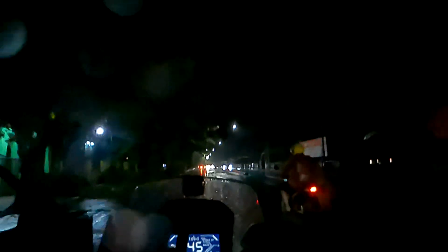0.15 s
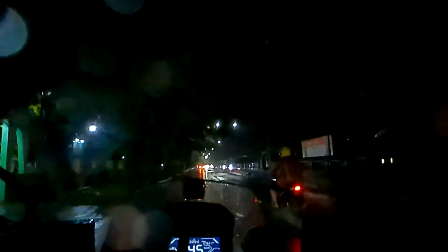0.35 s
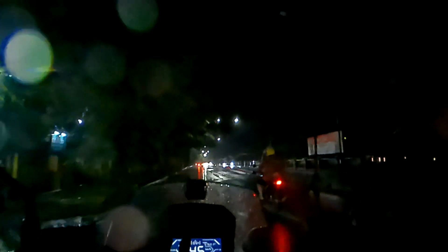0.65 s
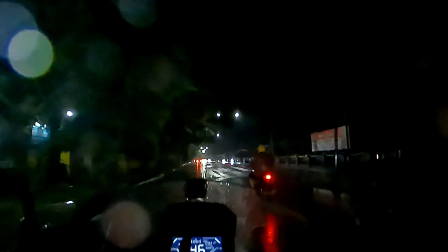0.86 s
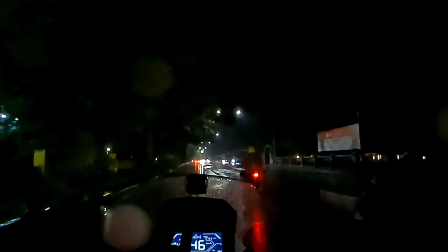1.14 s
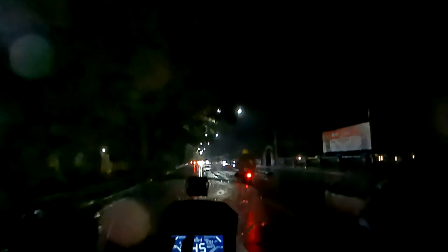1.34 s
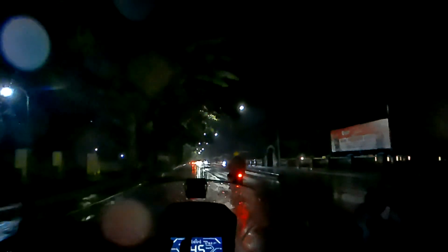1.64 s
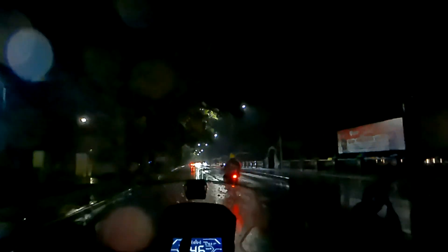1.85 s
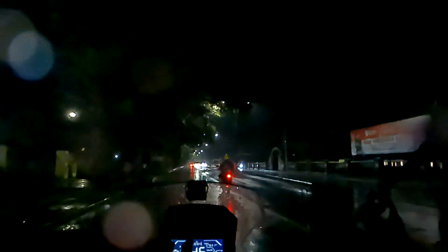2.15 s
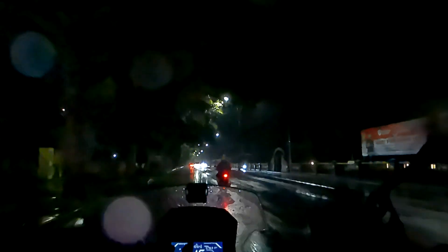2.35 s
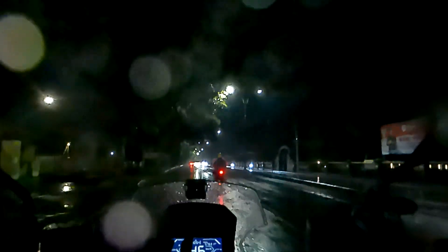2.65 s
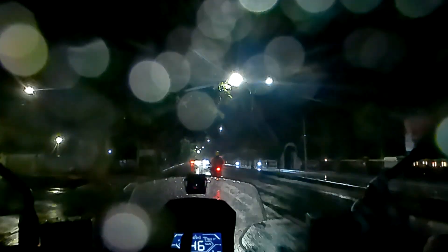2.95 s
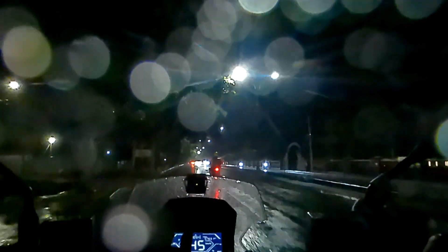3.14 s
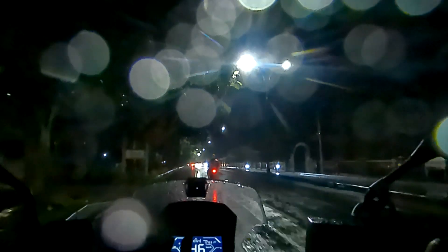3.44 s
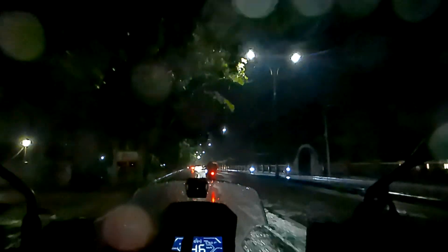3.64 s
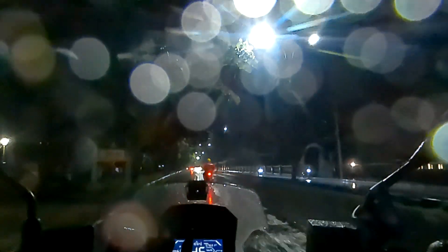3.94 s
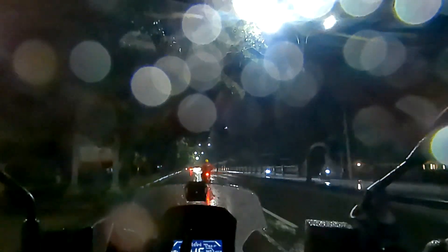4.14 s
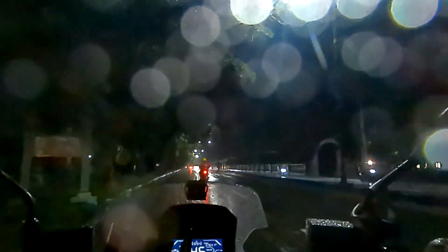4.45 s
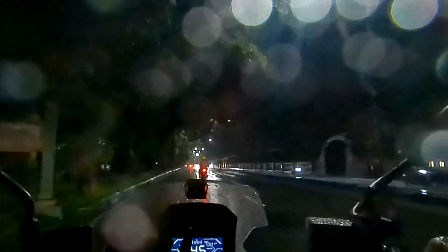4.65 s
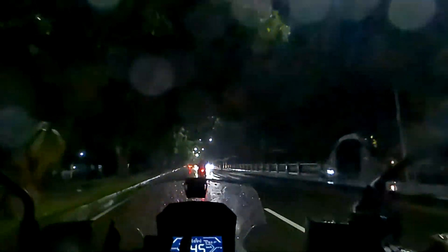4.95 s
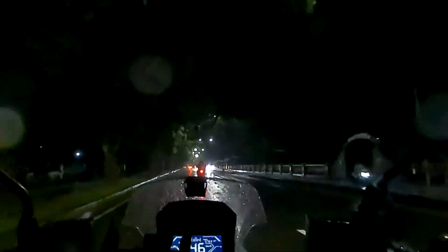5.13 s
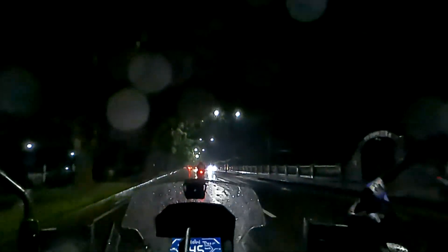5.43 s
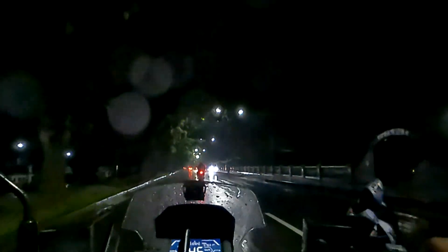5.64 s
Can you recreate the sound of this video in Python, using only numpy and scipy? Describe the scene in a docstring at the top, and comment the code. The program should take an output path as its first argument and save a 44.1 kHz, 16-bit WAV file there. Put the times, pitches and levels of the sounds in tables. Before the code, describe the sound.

Irregular close knocks of rain on plastic, with gusty wind thumps and the muffled drone of a scooter riding a wet road.

```python
"""On a scooter in night rain, heard from a camera in a closed plastic case.
Drops knock on the case and the screen beside it and ring their short modes; sheets of water break over it.
Wind buffets the microphone. Engine and wet-tyre roar comes through the same shell, dull and coloured,
with fine spray crackling above it."""
import sys
import numpy as np
from scipy import signal
from scipy.fft import rfft, irfft, next_fast_len
from scipy.io import wavfile
from scipy.ndimage import uniform_filter1d

SR = 44100
rng = np.random.default_rng(int(sys.argv[2]) if len(sys.argv) > 2 else 0)


def persist_wave(psi):
    """Save psi, clipped to +-1, as 16-bit WAV."""
    counts = np.round(np.clip(psi, -1, 1) * 32767).astype(np.int16)
    wavfile.write(sys.argv[1], SR, np.atleast_2d(counts).T)


N = 255339

# case hollows: f/Hz, width/Hz, gain/dB
HOLLOWS = [(500, 1100, -8), (1146, 40, 5), (1267.5, 380, 8), (1465, 41, 8.5), (1906, 390, 3),
           (2440, 380, -3), (3100, 250, -31.5), (4200, 700, -20.5), (5900, 1200, -27), (8200, 4000, -40)]
# envelopes: t/s, level/dB
ROAR_LEVEL = [(0.0, -62), (1.21, -61), (1.53, -63.5), (1.92, -62), (2.5, -58), (2.61, -60.5), (2.85, -58.5),
              (3.1, -61.5), (3.39, -62), (3.48, -60), (4.26, -63.5), (4.56, -63.5), (4.95, -61.5),
              (5.37, -62), (5.79, -61)]
SPRAY_LEVEL = [(0.0, -64), (0.16, -77), (0.68, -79.5), (1.01, -76), (1.84, -80.5), (2.0, -76), (2.43, -83),
               (2.61, -75), (3.22, -81.5), (3.85, -80), (4.37, -80), (4.59, -79.5), (4.71, -84.5),
               (5.14, -83), (5.55, -78.5), (5.79, -82)]
FLUTTER_LEVEL = [(0, -64.5), (.4, -65.5), (.98, -66.5), (1.21, -69), (2.26, -69.5), (2.52, -66),
                 (3.39, -69), (4.01, -61.5), (4.45, -72), (5.79, -65.5)]
# noise spectra: f/Hz, relative density/dB
SPRAY_SPECTRUM = [(2000, -26.5), (3000, -9.5), (3500, 3), (4200, 3.5), (5000, -7), (6000, -5), (7500, -9.5),
                  (9500, -17), (11000, -17.5), (12000, -42)]
BUFFET_SPECTRUM = [(3.5, -30), (6.0, -4.5), (16, 1), (29, 3.5), (51, -5.5), (71, -11), (118, -24.5),
                   (140, -20.5), (180, -41.5), (310, -120)]
FLUTTER_SPECTRUM = [(47, -20.5), (80, 4), (119, 0), (156, 1.5), (337, -11), (424, -11), (629, -15.5),
                    (1100, -22), (1430, -54), (2420, -120)]
# wind slaps: t/s, buffet level/dB, length/s, flutter level/dB
GUSTS = [(0.0, -41, 0.12, -59), (0.317, -46.5, 0.16, -74), (0.629, -41, .04, -68),
         (0.741, -43.5, 0.074, -71), (0.834, -39.5, 0.089, -64.5), (0.918, -44, 0.05, -62),
         (1.121, -39.5, 0.13, -57), (1.367, -46.5, 0.027, -58), (1.44, -48.5, 0.053, -60.5),
         (1.581, -35.5, 0.016, -64), (1.759, -53.5, 0.083, -67), (1.97, -46, 0.072, -61),
         (2.256, -49, 0.028, -71), (2.442, -42.5, 0.033, -56), (2.553, -45.5, 0.04, -60),
         (2.683, -42.5, 0.04, -50), (2.85, -60, 0.036, -58.5), (2.96, -57, 0.051, -59),
         (3.208, -47, 0.049, -63), (3.331, -54.5, .05, -53.5), (3.59, -56, 0.095, -75),
         (3.803, -44.5, 0.042, -64), (3.961, -43.5, 0.025, -70), (4.095, -51.5, 0.056, -72.5),
         (4.248, -42, 0.045, -57.5), (4.413, -43.5, 0.097, -64.5), (4.591, -49, 0.039, -67.5),
         (4.77, -49, 0.047, -61), (4.849, -42.5, .025, -64.5), (4.943, -45, 0.036, -66.5),
         (5.12, -43, 0.041, -69.5), (5.27, -52, 0.052, -64), (5.415, -38, 0.042, -58),
         (5.533, -54.5, 0.12, -66), (5.684, -48.5, 0.11, -66.5), (5.79, -39, 0.045, -66.5)]
# shell modes common to all drops: f/Hz, t60/s, gain/dB
SHELL_MODES = [(611, 0.034, -5.5), (777, 0.035, -2), (1060, 0.0023, -10), (1198, 0.0081, -8),
               (1353, 0.017, -5), (1864, 0.035, -3.5), (2186, 0.02, 2.5), (2840, 0.033, -12.5),
               (3090, 0.023, -6.5), (4407, 0.025, -10.5), (4930, 0.0031, -0.5), (5907, 0.016, -10),
               (6720, 0.005, -8.5), (7840, .009, -11), (9204, 0.0031, -9), (10940, .014, -24.5)]
# zones of a drop's spectrum: f/Hz
ZONES_HZ = [220, 750, 1400, 2150, 3100, 4150, 5600, 8500]
# impact spots, boomy back (row 0) to ticking front (row 8): gain/dB per zone
SPOTS = [(-1, -15, -27, -11, -16.5, -22.5, -21, -27), (-19, 1, -1, -11, -10, -18.5, -27, -26),
         (-24.5, -28.5, -0.5, -22.5, -15, -19.5, -14, -24), (-30, -20.5, -2, 2, -7.5, 0, -10, -7),
         (-23, -21, -12, -15.5, 3, -11.5, -27, -19), (-12, -22, -1.5, -9, -1, -3.5, -4.5, -1.5),
         (-30, -23.5, -24, -20, -15, 4.5, -44, -40), (-32, -24, -21.5, -27, -19.5, -5, -15.5, 3),
         (-34, -24.5, -23, -24.5, -10, -23, -12, -3)]
# distinct drops: t/s, level/dB, boom/dB, spot/0-8, hardness/(dB/octave),
# thud/Hz, knock/Hz, ping/Hz, t60 scale, splash/dB
DROPS = [(.002, -23.5, -13, 0.5, 1, 184, 1277, 4280, 0.94, -28),
         (.012, -15, -23, 4.5, -1.5, 151, 1380, 4080, 0.62, -17),
         (.097, -44.5, 3.5, 1.5, 0, 164, 1238, 4340, 1, -4.5),
         (.281, -34.5, -6, 6.5, -0.5, 171, 1190, 3770, 0.7, -10),
         (.391, -40.5, 5, 6.5, 0, 157, 1150, 3800, 0.46, -11),
         (0.462, -52, -2.5, 5, -5, 150, 1190, 4040, 0.57, -2),
         (0.577, -47, 8.5, 2, -2.5, 136, 1190, 3850, 1.5, -12),
         (1.008, -53, 8, 4.5, 3.5, 164, 1155, 4120, 0.52, 0),
         (1.097, -50, -10, 0, -0.5, 167, 1750, 3850, 1, 1.5),
         (1.277, -40, 3, 4.5, -4, 138, 1247, 3500, 0.56, -8.5),
         (1.417, -10.5, 2.5, 11, 4.5, 131, 1292, 4250, 0.74, -14),
         (1.588, -51, 10, 3.5, -1, 133, 1250, 4200, 1, -6),
         (1.604, -45.5, -3.5, 5, -2, 182, 1452, 4750, 0.87, 1.5),
         (1.907, -44.5, -7, 1, -1, 170, 1205, 3800, 1, -29),
         (1.958, -63, -1, 5.5, 2.5, 133, 1350, 4180, 0.97, -17),
         (1.98, -41.5, 8.5, 2, -2.5, 225, 1246, 4160, 0.47, -2.5),
         (1.997, -39, 0, 2, 2.5, 131, 1354, 3880, 0.65, -7),
         (2.026, -23, -2.5, 7, 1.4, 344, 1320, 4160, 0.33, -10.5),
         (2.055, -52, -2, 5, -4, 167, 1450, 3850, 0.86, -20),
         (2.076, -36, -1, 6, 5, 132, 1130, 3810, 0.89, -18),
         (2.085, -47, 8, 6.5, -2, 175, 1460, 3970, .61, -19),
         (2.211, -19.5, -6, 8, -2, 178, 1228, 4200, 1, -8.5),
         (2.374, -12.5, 1, 2, -1.5, 254, 1375, 3760, .45, -27),
         (2.474, -22.5, -0.5, 7, -0.5, 130.2, 1283, 3950, 0.6, -11),
         (2.686, -26, -9, 5, 3.5, 131.5, 1205, 3820, 0.32, -9),
         (2.701, -25, 3.5, 3.5, -2.5, 129, 1345, 3850, 0.6, -8.5),
         (2.716, -9.5, 2, 4, 0.5, 269, 1195, 3830, 0.54, -20.5),
         (2.732, -35.5, 2.5, 3.5, -6, 196, 1150, 3870, 0.83, -23),
         (2.779, -42, 0.5, 0, 0.5, 257, 1280, 3840, 1, -2.5),
         (2.967, -27.5, -6, 8, 0.5, 145.2, 1276, 4290, 1, -4),
         (3.004, -32, -0.5, 6, -2, 170, 1293, 3770, 1, -18.5),
         (3.161, -54, 5.5, 5, -1.5, 162, 1510, 3950, 0.91, 0),
         (3.322, -27, -4, 3, 1.7, 158, 1196, 4060, 0.59, -12),
         (3.341, -33.5, -0.5, 1, -2, 200, 1343, 4120, 0.5, -10),
         (3.446, -47, 1.5, 0.5, -2.5, 194, 1380, 3840, .71, -6),
         (3.475, -44, 8, 1.5, 0.5, 270, 1214, 3840, 0.97, -7),
         (3.485, -40.5, -0.5, -0.5, -1.8, 141, 1230, 3710, 0.71, -7),
         (3.493, -36.5, 0.5, 0.95, 0, 188.5, 1515, 3750, 1, -20),
         (3.609, -19, -4, 7, 0, 295, 1293, 3935, 0.55, -13),
         (3.676, -49.5, 1.5, 0, -2, 342.6, 1270, 4500, .69, 1),
         (3.855, -50.5, 5, 0, -1.5, 242.6, 1337, 4440, 0.75, -29),
         (3.958, -46, -7, 1.5, -5.5, 131.3, 1320, 4220, 0.71, -25.5),
         (4.036, -57.5, 0.5, 1.5, 5.5, 148, 1355, 3930, 0.91, -20),
         (4.172, -51.5, 0.5, -0.5, 0.5, 131, 1270, 4060, 1, -26.5),
         (4.319, -47, -6, 1.5, -1.5, 167.8, 1273, 4060, 0.79, -8),
         (4.389, -51.5, -3.5, 1, 5.5, 148, 1553, 3930, 0.74, -23),
         (4.585, -47.5, 7.5, 1.1, 1.5, 142.3, 1190, 4125, 0.88, -7.5),
         (4.64, -55, 6, 6, -1, 142.2, 1320, 3940, .9, -16),
         (4.704, -4.5, 3.5, 2, 2, 161, 1602, 3930, 0.67, -27.5),
         (4.716, -35, -3, 2.5, -5, 215, 1280, 3800, 0.85, -24.5),
         (4.817, -12.5, 1.5, 7.5, 1.5, 434, 1257, 4200, 0.72, -14),
         (5.039, -53.5, 1.5, 3, -7.5, 161, 1305, 4360, .66, -2.5),
         (5.294, -55, 1.5, 6.5, 3.5, 173, 1190, 4110, 1, -6),
         (5.376, -38, 2.5, 7, -0.5, 172, 1300, 3730, 0.82, -9.5),
         (5.515, -33, -4.5, 0.9, -1.5, 165, 1314, 3830, 0.56, -10),
         (5.561, -50, 6, 2, 2, 132, 1560, 3900, 0.94, -9),
         (5.695, -41.5, -10, 1, -0.5, 132, 1338, 3820, 1, -30),
         (5.709, -41, -10, 5.5, 0, 133, 1340, 4040, 1, -12)]
# water sheets: t/s, length/s, level/dB, treble/dB
SHEETS = [(0.002, 0.034, -61.5, -28), (0.274, 0.027, -70, 0), (0.368, 0.063, -70.5, -10),
          (0.434, 0.1, -73.5, -18), (1.018, 0.023, -76, -15), (1.413, 0.029, -53, -15.5),
          (1.586, 0.048, -69.5, 0.5), (1.964, 0.041, -64, -18), (2.037, 0.037, -65, -11),
          (2.206, 0.022, -72, 3), (2.387, 0.049, -68, -10), (2.727, 0.037, -65, -15),
          (2.958, 0.045, -63.5, -8.5), (3.159, 0.023, -70.5, -6), (3.33, 0.037, -70, -9),
          (3.434, 0.079, -76.5, 3.5), (4.812, 0.027, -55, -5), (5.039, 0.042, -82.5, 0),
          (5.286, 0.03, -71, -12.5), (5.38, 0.019, -67, 0), (5.553, 0.062, -72, 2.5),
          (5.702, 0.024, -68, 0.5)]

SPRAY_PER_S, PATTER_PER_S = 1500, 22
LULL_DB = -57  # buffet between slaps
THUD_T60_S, KNOCK_T60_S, PING_T60_S, SPLASH_T60_S = 0.044, 0.03, 0.016, 0.14
PUSH_S, BOOM_BELOW_HZ, CLEAN_KNOCK_DB_PER_DB = 0.00027, 1000, 0.18
TREBLE_CUT_HZ, OUTPUT_CUT_HZ, HISS_DB, DC_OFFSET = 11100, 15600, -92.5, -.0021


def undb(db):
    """Decibels to gain."""
    return 10 ** (np.asarray(db) / 20)


def unit(x):
    """Scale to rms 1."""
    return x / np.sqrt(np.mean(x ** 2))


def smooth(x, samples):
    """Two-pass moving average."""
    return uniform_filter1d(uniform_filter1d(x, samples), samples)


def envelope(table):
    """Gain per sample from t/s, level/dB rows."""
    return undb(np.interp(np.arange(N) / SR, *np.transpose(table)))


def walk(rate_hz):
    """Smoothed random steps, rms 1."""
    hold = int(SR / rate_hz)
    steps = np.repeat(rng.standard_normal(N // hold + 1), hold)
    return unit(smooth(steps, hold)[:N])


def coloured(spectrum, x=None):
    """Noise, or x, shaped by a spectrum; rms 1."""
    size = next_fast_len(N)
    hz = np.maximum(np.arange(size // 2 + 1) * SR / size, 1)
    knot_hz, knot_db = np.transpose(spectrum)
    db = np.interp(np.log(hz), np.log(knot_hz), knot_db, left=-90, right=-90)
    x = rng.standard_normal(N) if x is None else x
    return unit(irfft(rfft(x, size) * undb(db), size)[:N])


def add(out, start_s, sound):
    """Mix sound into out."""
    i = max(int(start_s * SR), 0)
    out[i:i + len(sound)] += sound[:N - i]


def road_roar():
    """Engine and tyre noise rings the case hollows."""
    roar, ripple_db = 0, 1.5 * walk(50)
    for hz, width_hz, db in HOLLOWS:
        hollow = signal.iirpeak(hz, hz / width_hz, SR)
        band = signal.lfilter(*hollow, signal.lfilter(*hollow, rng.standard_normal(N)))
        gain = undb(db + walk(10) + 2 * walk(35) + ripple_db)
        roar = roar + gain * unit(band) * np.sqrt(width_hz)
    return unit(roar) * envelope(ROAR_LEVEL)


def spray():
    """Fine droplets of very unequal size crackle; each treble band comes and goes in patches."""
    droplets = (rng.random(N) < SPRAY_PER_S / SR) * undb(2.5 * rng.exponential(size=N))
    smear = signal.lfilter([1], [1, -np.exp(-1 / (.003 * SR))], droplets)  # 3 ms decay
    mist = coloured(SPRAY_SPECTRUM, smear * rng.standard_normal(N))
    crackle, gust_db = 0, 1.5 * walk(25)
    for band_hz in [(2000, 3500), (3500, 5000), (5000, 7000), (7000, 9000), (9000, 12000)]:
        band = signal.sosfilt(signal.butter(2, band_hz, "band", fs=SR, output="sos"), mist)
        crackle = crackle + undb(gust_db + 1.8 * walk(35)) * band
    return unit(crackle) * envelope(SPRAY_LEVEL)


def wind():
    """Slow pressure slaps on the microphone; each drags a higher flutter along."""
    t = np.arange(0, N + 128, 128) / SR
    peak_s, buffet_db, length_s, flutter_db = np.transpose(GUSTS)[:, :, None]
    swells = np.exp(-((t - peak_s) / np.maximum(length_s / 2, .005)) ** 2)

    def slaps(db):
        return np.interp(np.arange(N) / SR, t, (undb(db) * swells).sum(axis=0))

    buffet = coloured(BUFFET_SPECTRUM)
    local_rms = np.sqrt(smooth(buffet ** 2, 2048))
    buffet = unit(buffet / local_rms ** 1.4)  # gusts, more than chance, set slap strength
    lump_db = 2.5 * walk(30)
    flutter = unit(coloured(FLUTTER_SPECTRUM) * undb(lump_db))
    buffet_gain = undb(LULL_DB) + slaps(buffet_db)
    flutter_gain = envelope(FLUTTER_LEVEL) + slaps(flutter_db)
    return buffet * buffet_gain + flutter * flutter_gain


def drop(zone_db, thud_hz, knock_hz, ping_hz, t60_scale, splash_db, samples=4096):
    """A short push rings the modes; the spreading water then rustles them."""
    t = np.arange(samples) / SR
    knock_db = CLEAN_KNOCK_DB_PER_DB * max(-13.5 - splash_db, 0)  # a square, dry hit rings purely
    own_modes = [(thud_hz, THUD_T60_S, 0), (knock_hz, KNOCK_T60_S, knock_db), (ping_hz, PING_T60_S, 0)]
    hz, t60_s, db = np.transpose(SHELL_MODES + own_modes)[:, :, None]
    scatter_db, detune, shift = rng.standard_normal((3, len(hz), 1))
    gain = undb(db + np.interp(np.log(hz), np.log(ZONES_HZ), zone_db) + scatter_db)
    phase = 2 * np.pi * hz * (1 + .01 * detune) * t
    ring = np.exp(-np.log(1000) * t / (t60_s * np.clip(t60_scale, .2, 3))) * np.sin(phase + 3 * shift)
    # the flattening drop pushes on unevenly: the ring swells, rougher when wetter
    ring *= (t / PUSH_S) ** 1.39 / (1 + (t / PUSH_S) ** 1.165)
    roughness = 6 * np.clip(0.7 + splash_db / 68, .05, .5)
    ring *= 1 + roughness * smooth(rng.standard_normal(ring.shape), 30)
    ring /= np.abs(ring).max(axis=1, keepdims=True)
    shake = 9 * signal.lfilter(np.hanning(128) / 64, 1, rng.standard_normal(ring.shape))
    rustle_t60_s = SPLASH_T60_S * np.minimum(1, 2070 / hz) ** 1.44  # treble dries first
    rustle = shake * np.sin(phase) * np.exp(-np.log(1000) * t / rustle_t60_s)
    return (gain * (ring + undb(splash_db) * rustle)).sum(axis=0)


def rain():
    """Distinct drops, coloured by impact spot and hardness."""
    out = np.zeros(N)
    zones_hz = np.array(ZONES_HZ)
    for start_s, db, boom_db, spot, hardness_db_per_oct, *voice in DROPS:
        spot_db = np.array([np.interp(spot, range(len(SPOTS)), zone) for zone in np.transpose(SPOTS)])
        tilt_db = hardness_db_per_oct * np.log2(zones_hz / 2150)
        zone_db = db + spot_db + tilt_db + boom_db * (zones_hz < BOOM_BELOW_HZ)
        add(out, start_s - .0004, drop(zone_db, *voice))
    return out


def water_sheets():
    """Each sheet breaks as a ragged hiss: quick rise, then it drains."""
    dull = coloured(SPRAY_SPECTRUM)
    bright = unit(np.gradient(dull))
    out = np.zeros(N)
    for start_s, length_s, db, treble_db in SHEETS:
        age = np.arange(int(2 * length_s * SR)) / (length_s * SR)
        i = int(start_s * SR)
        shape = np.minimum(age / .1, 1) * np.exp(-age ** 3)
        hiss = dull[i:i + len(age)] + undb(treble_db) * bright[i:i + len(age)]
        add(out, start_s, undb(db) * shape[:N - i] * hiss)
    return out * undb(2.9 * walk(150))


def patter():
    """Faint small drops landing at random."""
    out = np.zeros(N)
    zone_db = np.array([-80, -82, -75, -77, -83, -79, -83, -83])
    for when, size_rank, spot in rng.random((int(PATTER_PER_S * N / SR), 3)):
        scatter_db = 4 * rng.standard_normal(len(ZONES_HZ))
        size_db = -2.4 * np.log(size_rank)
        modes_hz = 150 + 200 * spot, 1200 + 450 * spot, 3700 + 700 * spot
        tick = drop(zone_db + size_db + scatter_db, *modes_hz, t60_scale=.7, splash_db=-4.5, samples=1536)
        add(out, when * N / SR, tick)
    return out


def scene():
    """Water, road and wind at one microphone."""
    water = rain() + patter() + water_sheets()
    return (water + road_roar() + spray() + wind())[None, :]


def record(dry):
    """Camera: treble cut, faint hiss, DC offset, output low-pass."""
    cut = signal.sosfilt(signal.ellip(8, 1, 55, TREBLE_CUT_HZ, fs=SR, output="sos"), dry)
    noisy = cut + undb(HISS_DB) * rng.standard_normal(dry.shape) + DC_OFFSET
    return signal.sosfilt(signal.ellip(8, .2, 50, OUTPUT_CUT_HZ, fs=SR, output="sos"), noisy)


dry = scene()
out = record(dry)
persist_wave(out)
```